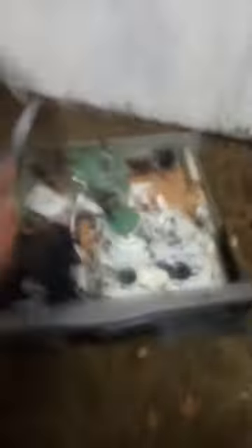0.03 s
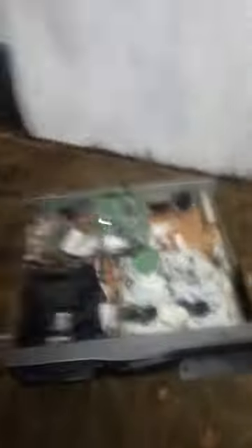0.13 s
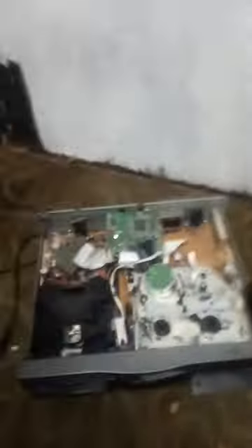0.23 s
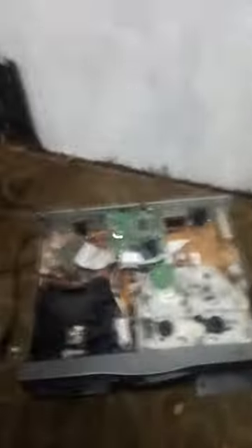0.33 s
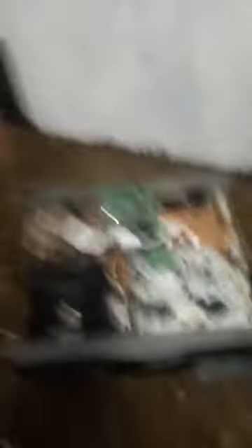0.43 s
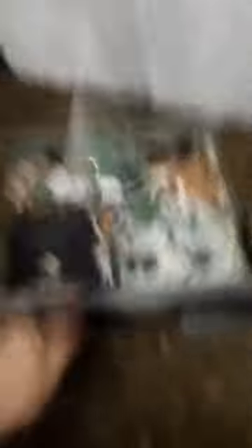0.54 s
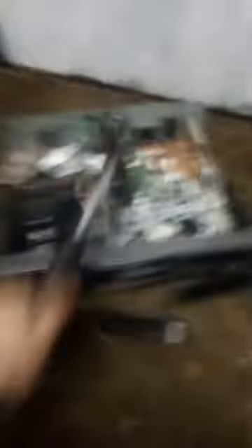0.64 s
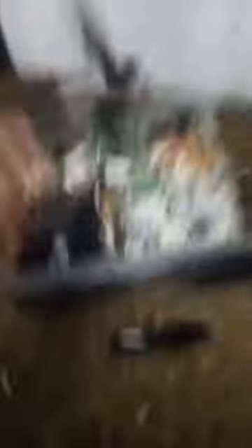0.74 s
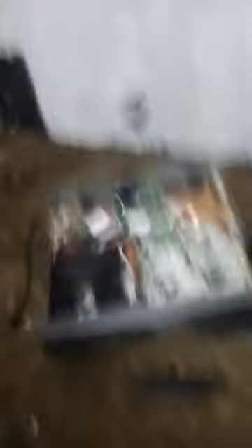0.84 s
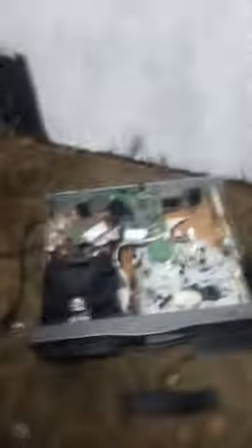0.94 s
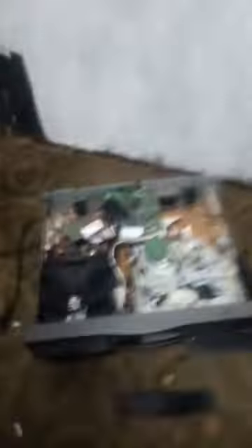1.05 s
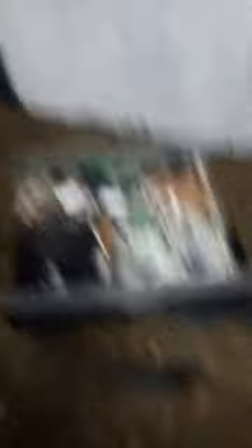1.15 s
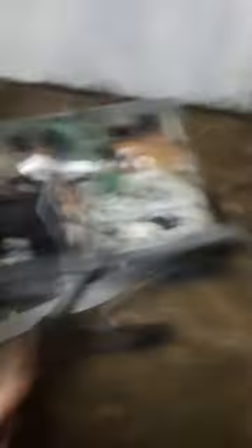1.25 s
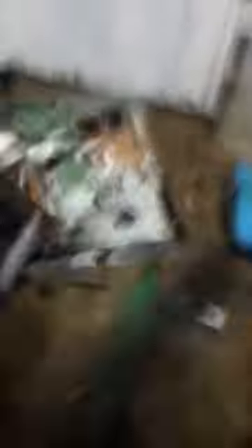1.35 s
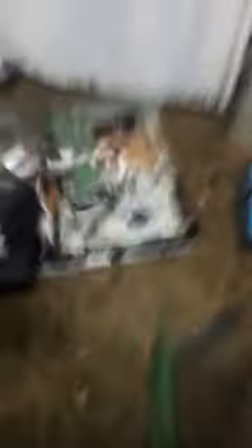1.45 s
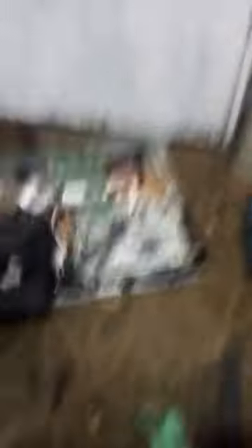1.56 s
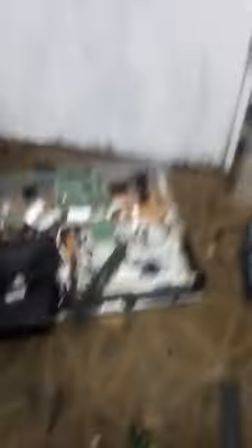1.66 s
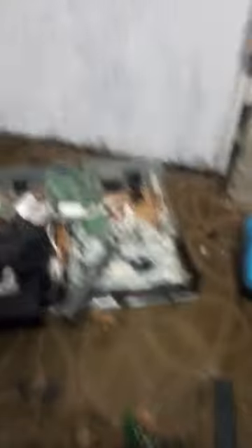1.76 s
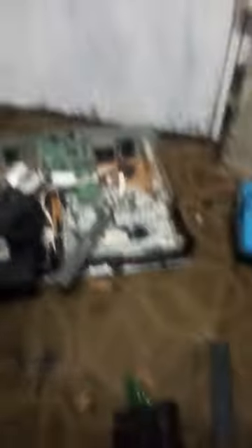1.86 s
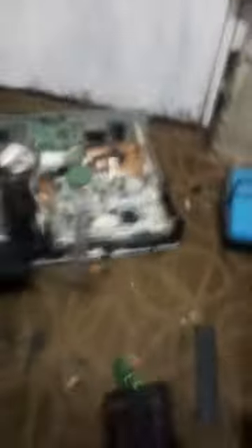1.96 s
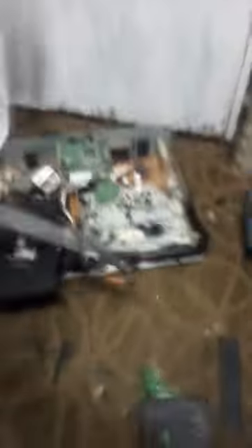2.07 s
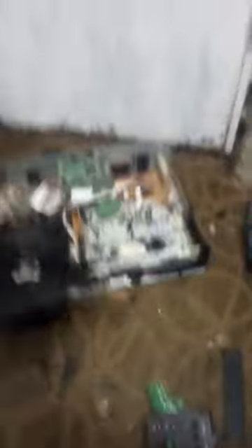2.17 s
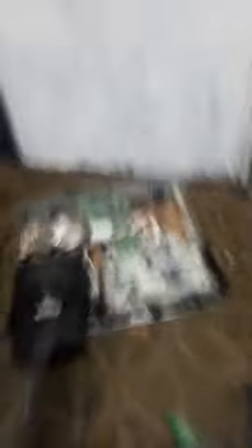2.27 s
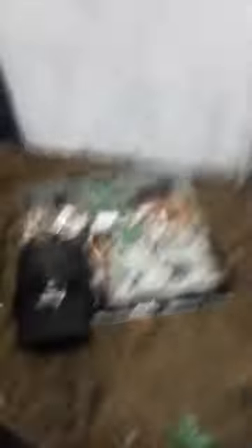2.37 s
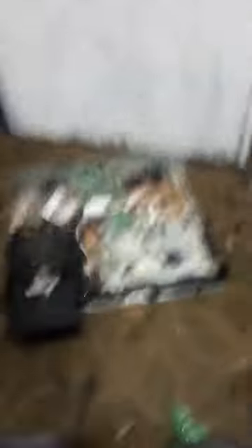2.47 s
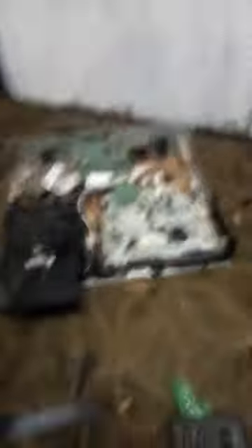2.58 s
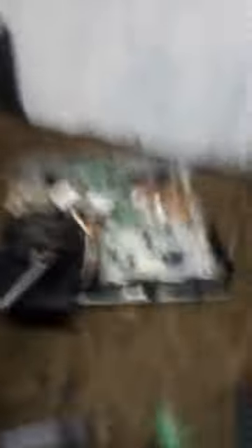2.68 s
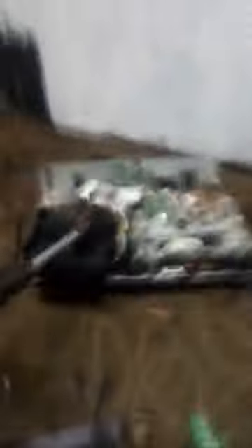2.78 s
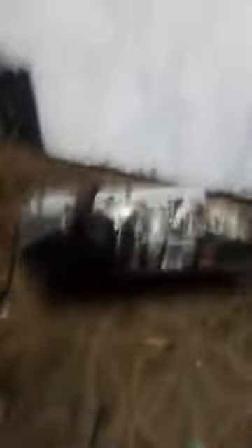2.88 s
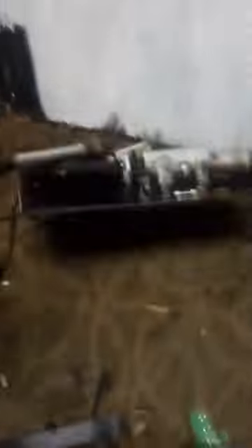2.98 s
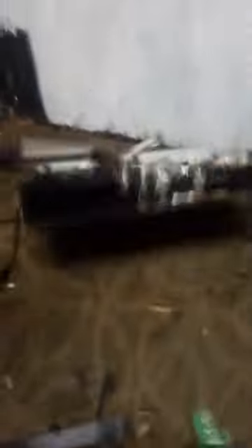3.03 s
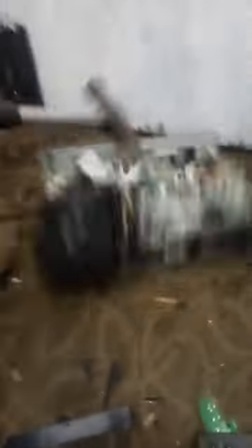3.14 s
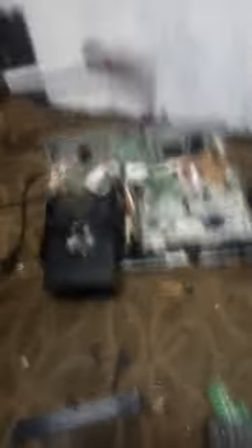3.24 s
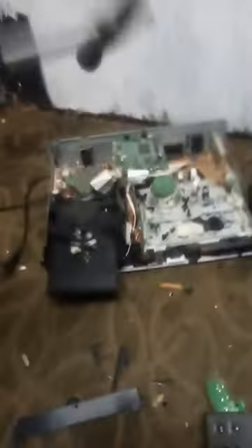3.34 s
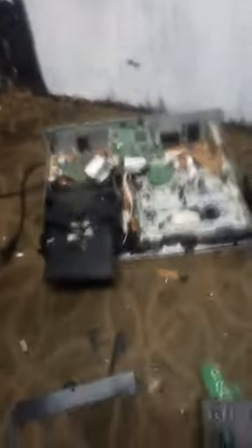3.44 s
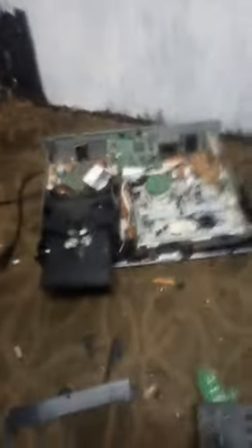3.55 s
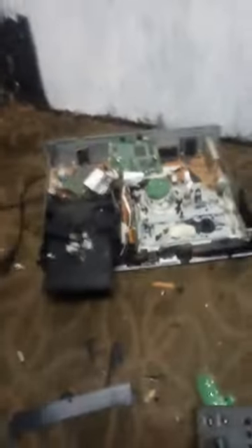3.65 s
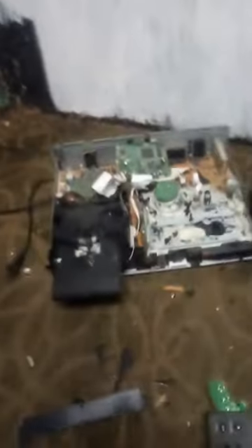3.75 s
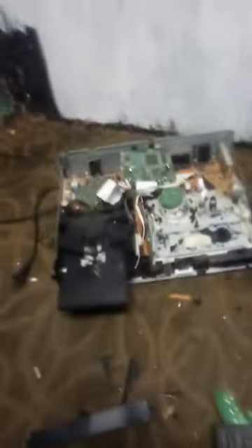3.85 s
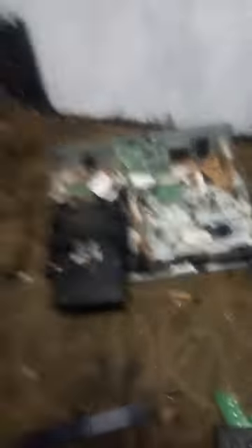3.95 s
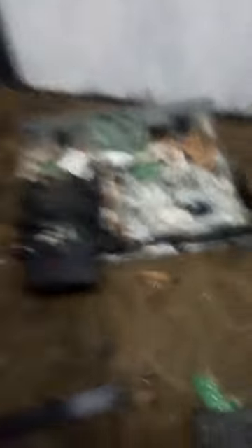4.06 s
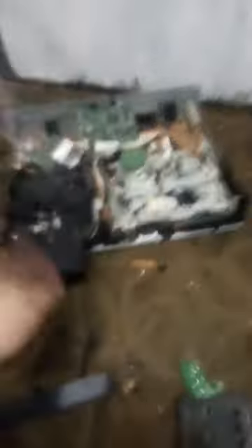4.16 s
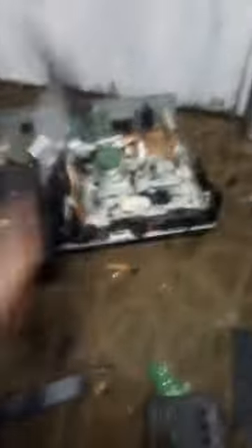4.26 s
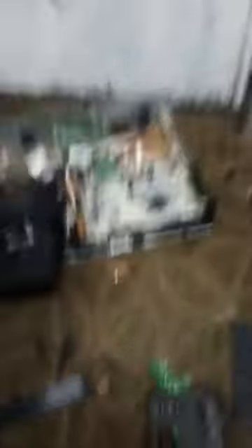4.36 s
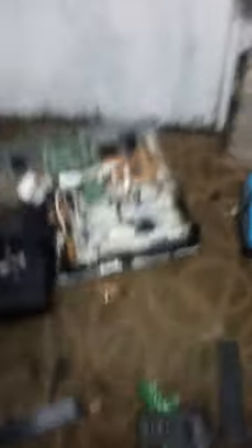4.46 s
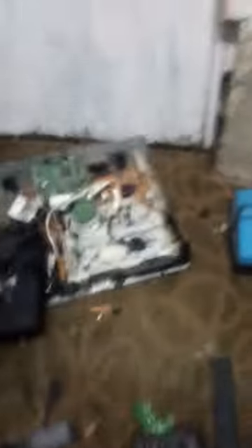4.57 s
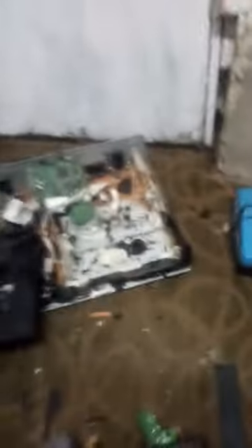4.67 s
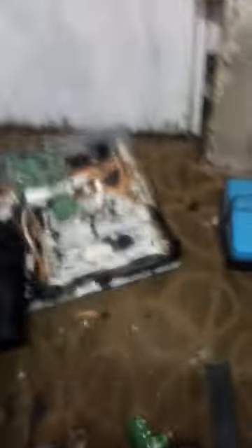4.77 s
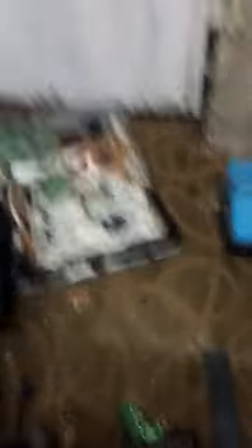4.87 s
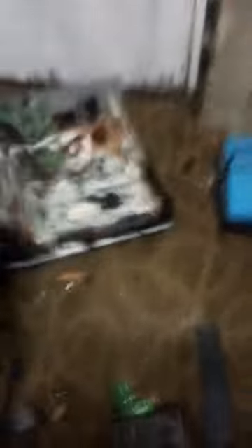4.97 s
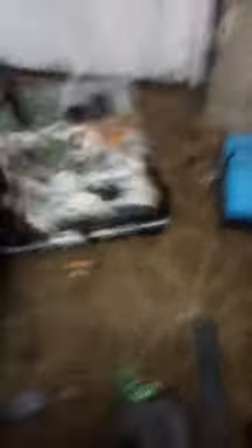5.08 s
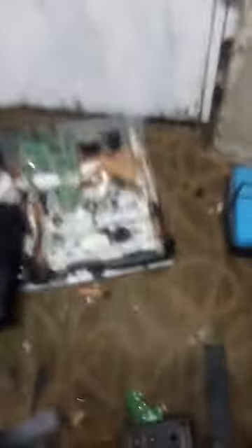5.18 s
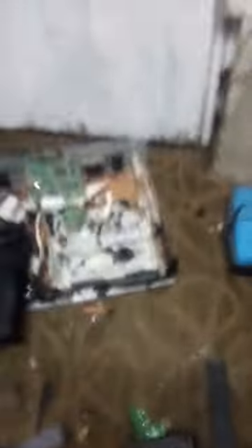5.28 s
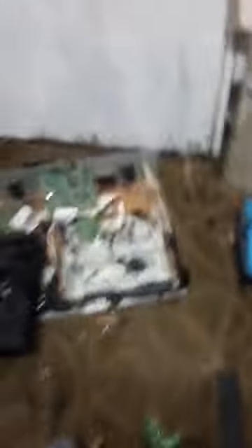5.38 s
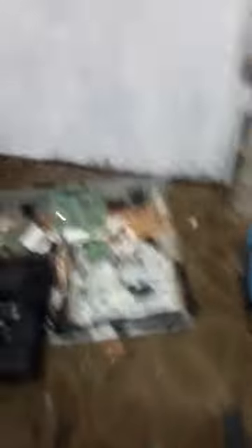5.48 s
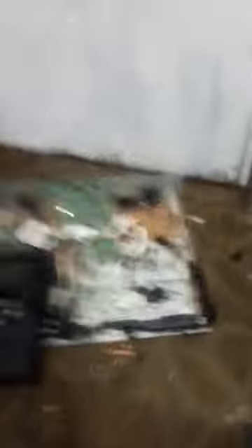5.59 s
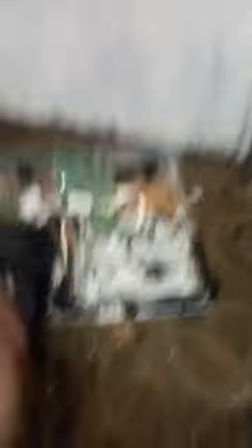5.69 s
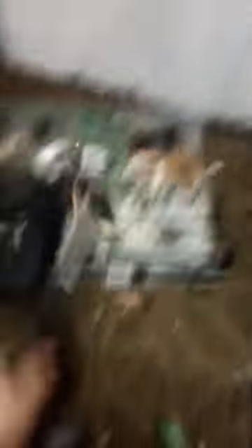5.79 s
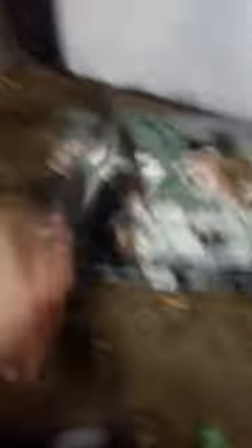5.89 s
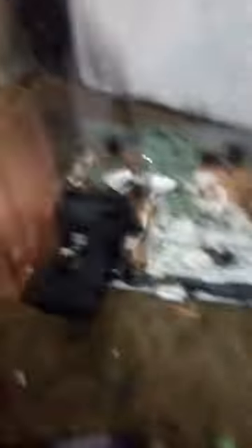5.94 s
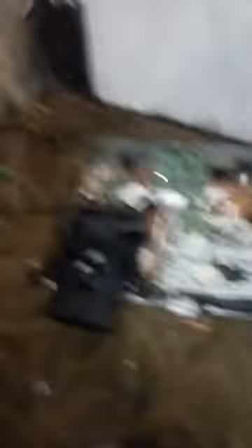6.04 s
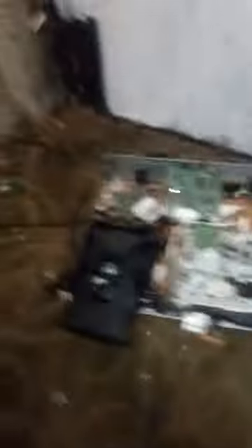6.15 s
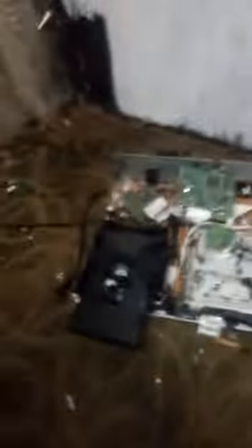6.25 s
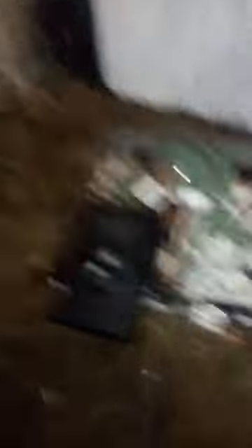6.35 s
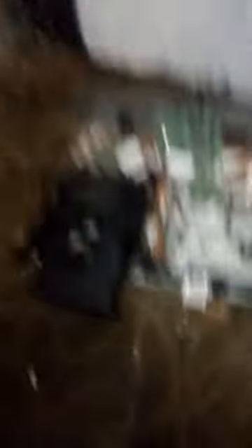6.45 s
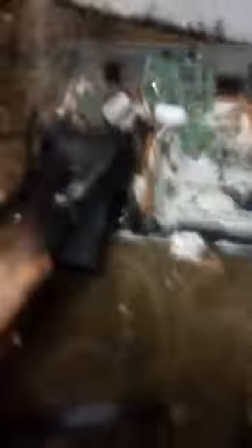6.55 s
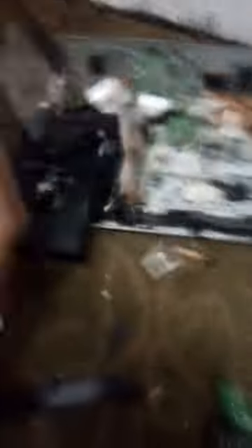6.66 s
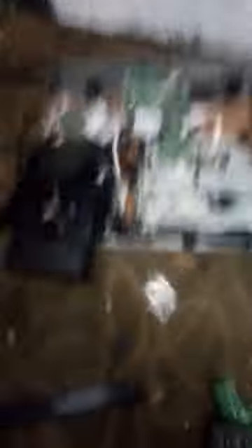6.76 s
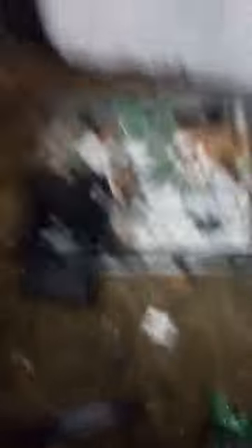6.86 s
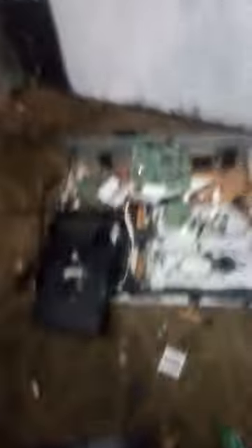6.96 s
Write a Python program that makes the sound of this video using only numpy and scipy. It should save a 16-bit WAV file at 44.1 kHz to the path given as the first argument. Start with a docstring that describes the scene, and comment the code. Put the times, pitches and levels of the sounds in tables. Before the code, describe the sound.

Close, harsh hammer blows crush a plastic and metal device about every seven tenths of a second, loose parts rattling and bits clinking outdoors.

```python
"""On the ground of a yard, close to a phone, a hammer smashes an opened electronic player: nine blows in seven seconds.
Each blow is grainy noise for the crushed plastic, scattered modes for the frame and a low noise thump.
The case lands again, larger pieces knock, small ones tinkle, loose parts rattle, and grainy noises rumble or scrape.
A faint yard answer and quiet air lie behind; the phone's limiter flattens the blows into short harsh bursts."""
import sys
import numpy as np
from scipy import signal
from scipy.fft import rfft, irfft, next_fast_len
from scipy.io import wavfile
from scipy.ndimage import uniform_filter1d

SR = 44100
rng = np.random.default_rng(int(sys.argv[2]) if len(sys.argv) > 2 else 0)


def dump(signal):
    """Clip the signal to [-1, 1] and save it as 16-bit WAV at the path in sys.argv[1]."""
    limited = np.clip(np.atleast_2d(signal).T, -1, 1)
    pcm = np.round(limited * 32767).astype(np.int16)
    wavfile.write(sys.argv[1], SR, pcm)


N = 309582
TIME = np.arange(N) / SR  # seconds
TAIL = np.arange(SR * 2 // 5) / SR  # time axis of one short sound, 0.4 s
TOP_HZ = 15900  # upper band limit

# All event levels are mix levels ahead of the phone. A t60 is the time to fall by 60 dB.
# Hammer blows. Each row: start in seconds, level in dB, crush t60 in seconds, thump in dB relative to
# that level, rattle drive in dB, rattle hold in seconds, extra rattle fall after the hold in dB per second.
HAMMER_BLOWS = [(0.581, -3.5, 0.1, -9.5, -26.5, 0.085, 86), (1.2706, -10, .2, -2.5, -30.5, 0.17, 163),
                (1.9958, -5, 0.096, -12, -26.5, 0.13, 161.5), (2.649, -16, 0.23, -2.5, -30, 0.14, 152.5),
                (3.217, -17.5, 0.19, -5, -32, .1, 152.5), (4.195, -9, .13, -8, -27, 0.16, 109.5),
                (4.971, -4, 0.08, -11, -27.5, 0.17, 130), (5.8068, -7.5, 0.11, -8, -26.5, .12, 148),
                (6.604, -9, 0.16, -5.5, -28, 0.128, 135)]
# The case falls back and shakes its parts again. Each row: start in seconds, level in dB, crack t60 in seconds,
# bump in dB relative to that level, rattle drive in dB, rattle hold in seconds, extra fall in dB per second.
CASE_LANDINGS = [(0.058, -22, 0.21, -11.5, -30.5, .11, 208), (.753, -21.5, 0.15, -10.5, -29, 0.15, 122),
                 (1.492, -25.5, 0.59, 0.5, -45.5, 0.26, 90.5), (2.875, -16.5, 0.095, -9, -34.5, 0.14, 64),
                 (3.336, -22.5, 0.13, -20.5, -31, .1, 189), (4.353, -25.5, 0.11, -23, -38, 0.14, 106),
                 (5.146, -22, .14, -14.5, -29.5, 0.16, 202), (5.966, -22.5, 0.15, -9.5, -28, 0.12, 113),
                 (6.733, -21, 0.041, -15, -27, .05, 131)]
# Larger pieces knock about. Each row: start in seconds, level in dB, crack t60 in seconds,
# bump in dB relative to that level.
PIECE_KNOCKS = [(0.136, -24, 0.018, -16.5), (.152, -26.5, 0.017, -30), (0.4557, -39.5, 0.14, -50),
                (0.662, -33, 0.047, 2.5), (.766, -23, .072, -10.5), (0.865, -31.5, 0.05, -14.5),
                (0.883, -26.5, 0.088, -17), (1.1, -34, 0.15, -42), (1.512, -29, 0.041, -1.5),
                (1.628, -27.5, 0.13, -40), (1.751, -29, 0.24, -20), (2.138, -25, 0.024, -36),
                (2.223, -30.5, 0.056, -42), (2.92, -14, 0.044, -13), (3.003, -30.5, 0.13, -15),
                (3.051, -21, 0.071, -20), (3.4, -30.5, .086, -30), (4.348, -18.5, 0.021, -16.5),
                (4.401, -24, 0.034, -23), (4.419, -19.5, 0.03, -25), (4.508, -38, 0.044, -30),
                (4.674, -48.5, 0.26, -37), (5.069, -23, 0.035, -9.5), (5.258, -25, 0.072, -31),
                (5.329, -31.5, .056, -43), (5.4405, -25.5, 0.03, -9), (5.931, -27.5, .029, -4),
                (6.148, -26.5, 0.05, -54), (6.352, -42, 0.12, -36), (6.835, -28, 0.067, -12),
                (6.88, -53, 0.37, 4), (6.99, -45, 0.1, -38)]
# Small parts ring. Each row: start in seconds, level in dB, main pitch in Hz, t60 in seconds.
SMALL_CLINKS = [(.168, -35, 11600, 0.075), (.403, -59, 4900, .07), (0.4541, -24.5, 6230, 0.03),
                (.98, -35, 6030, 0.06), (1.039, -44.5, 4940, .15), (1.118, -27.5, 5380, 0.058),
                (1.181, -55, 5460, 0.13), (1.207, -60, 2560, 0.11), (1.244, -52, 5500, 0.16),
                (1.71, -38, 9600, .043), (2.333, -43, 5000, 0.052), (2.416, -33, 7600, 0.047),
                (2.511, -47.5, 4460, 0.096), (2.545, -61, 3900, .055), (2.559, -44, 4420, .15),
                (2.588, -47.5, 4290, 0.26), (2.615, -51, 5750, .14), (3.621, -52, 5500, .02),
                (3.734, -52, 6330, 0.075), (3.757, -51, 6130, 0.12), (3.76, -64, 3620, 0.27),
                (3.862, -47, 6070, 0.073), (3.865, -64, 3610, 0.211), (3.897, -51, 6100, 0.11),
                (4.58, -49.5, 9800, 0.063), (5.439, -29.5, 3770, 0.073), (5.438, -47, 3040, 0.16),
                (6.352, -41, 2020, 0.11), (6.54, -55.5, 10040, 0.011), (6.801, -32, 9020, 0.16),
                (6.891, -39.5, 8940, 0.15)]
# Short grainy resonant noises, from low rumbles to bright scrapes.
# Each row: start in seconds, length in seconds, level in dB, resonance in Hz.
GRAINY_NOISES = [(0, 0.051, -34, 630), (.455, 0.031, -36, 4600), (0.588, 0.031, -23, 640),
                 (0.866, 0.027, -30.5, 840), (1.104, .07, -50.5, 850), (1.735, 0.14, -32.5, 4850),
                 (1.747, .11, -35, 7500), (1.889, 0.021, -51.5, 1190), (1.953, 0.015, -62.5, 1290),
                 (2.543, 0.075, -40, 4360), (2.96, 0.23, -46.5, 424), (3.031, 0.11, -50, 193),
                 (3.509, 0.032, -40.5, 2330), (4.254, .2, -37.5, 371), (4.286, 0.036, -26, 1540),
                 (4.512, 0.11, -52, 1160), (4.686, .05, -62.5, 2780), (5.018, 0.19, -41, 362),
                 (5.859, 0.42, -39.5, 590), (6.02, 0.26, -39, 1850), (6.259, 0.019, -36, 1030),
                 (6.297, 0.014, -42, 1920)]
# Further bouts of rattling; the first is already under way when the sound begins.
# Each row: start in seconds, rattle drive in dB, hold in seconds, extra fall after the hold in dB per second.
FURTHER_BOUTS = [(-.02, -25, 0.029, 161), (1.38, -29.5, 0.075, 177), (4.76, -65, 0.25, 87)]
# Low modes of the case on the ground. Each row: centre pitch in Hz, relative level in dB, t60 in seconds.
CASE_MODES = [(85, -13.5, 0.17), (123, -4.5, 0.087), (166, -3.5, 0.23), (230, 8, 0.062), (328, 3.5, 0.14)]
# Resonances of the sheet-metal chassis. Each row: pitch in Hz, width in Hz, relative strength in dB.
CHASSIS_MODES = [(623, 15, 3), (800, 30, -12.5), (1404, 110, 3), (1990, 150, -8), (4870, 1000, -16)]
# Colour of breaking plastic. Each row: frequency in Hz, relative density in dB per Hz.
CRUSH_COLOUR = [(60, -31), (150, -18.5), (390, -19.5), (550, -4), (1300, 0.5), (2700, 2), (6300, 4),
                (10000, -4.5), (16000, -7)]
# Colour of the low thump. Each row: frequency in Hz, relative density in dB per Hz.
THUMP_COLOUR = [(25, -31.5), (45, -27), (75, -5.5), (130, 0.5), (260, 0), (500, -4), (900, -7.5),
                (3000, -59.5)]
# Colour laid over the rattling parts. Each row: frequency in Hz, gain in dB.
PARTS_COLOUR = [(45, -29), (90, -9.5), (200, -2.5), (390, -9.5), (520, 0), (850, 0), (1400, 2.5),
                (2900, 3.5), (6200, 3), (10000, -5), (16000, -11.5)]
# Colour of the outdoor air. Each row: frequency in Hz, relative density in dB per Hz.
AIR_COLOUR = [(25, -5), (80, 0), (250, -4.5), (1000, -12), (4000, -26), (7000, -10.5), (10000, -8),
              (16000, -36)]
# Response of the phone's microphone. Each row: frequency in Hz, gain in dB.
MICROPHONE_RESPONSE = [(35, -8.5), (90, -2), (6500, -1.5), (8200, -3.5), (9900, 8.5), (11200, 2),
                       (12500, -4.5), (13900, -1), (14900, 2), (16000, 6.5)]

RATTLE_ATTACK_S, RATTLE_SAG_DB_PER_S = 0.015, 7.5  # the parts get going, then lose a little while they bounce
SETTLE_DB, SETTLE_DB_PER_S = -46.5, 39  # last crumbs ticking after a blow; their fall adds to the sag


def amp(db):
    """Decibels to gain."""
    return 10 ** (np.asarray(db) / 20)


def unit(x):
    """Scale to rms 1."""
    return x / np.sqrt(np.mean(x ** 2) + 1e-20)


def fade(t60):
    """An exponential decay of 60 dB in t60 seconds."""
    return np.exp(-np.log(1000) * TAIL / t60)


def shape(points, hz):
    """Gain at hz from rows of frequency and dB, joined on a log frequency axis."""
    f, db = np.transpose(points)
    return amp(np.interp(np.log(hz + 1), np.log(f), db))


def filtered(x, response):
    """Multiply the spectrum of x by a response of frequency."""
    size = next_fast_len(len(x) + SR // 10)
    spectrum = rfft(x, size) * response(np.fft.rfftfreq(size, 1 / SR))
    return irfft(spectrum, size)[:len(x)]


def resonance(f, hz, width):
    """Response of one damped mode, with gain 1 at its pitch."""
    return 1j * f * width / (hz * hz - f * f + 1j * f * width)


def noise(points, size):
    """Coloured noise of rms 1."""
    return unit(filtered(rng.standard_normal(size), lambda hz: shape(points, hz)))


def burst(sound, envelope):
    """A sound under an envelope, with the envelope's own energy."""
    return unit(sound * envelope) * np.sqrt(np.mean(envelope ** 2))


def add(track, s, sound):
    """Mix a sound into the track at s seconds."""
    part = track[round(s * SR):][:len(sound)]
    part += sound[:len(part)]


def hammer(thump_t60=0.14, thump_rise=0.0087, ring_db=-5, give=1.13):
    """Each blow crushes plastic, rings the frame and drives the case into the ground."""
    out = np.zeros(N)
    onset = 1 - np.exp(-TAIL / .0008)
    thump_envelope = fade(thump_t60) * (1 - np.exp(-TAIL / thump_rise))
    for s, db, t60, thump_db, *_ in HAMMER_BLOWS:
        # the plastic keeps breaking while the head sinks in, then stops quickly
        crushing = np.exp(-np.log(1000) * (TAIL / t60) ** give)
        crush = burst(crunch(grain_db=-2.5), crushing)
        frame = amp(ring_db) * shard(t60, spread_db=1.0, count=90)
        thump = amp(thump_db) * burst(noise(THUMP_COLOUR, len(TAIL)), thump_envelope)
        add(out, s, amp(db) * (crush + frame + thump) * onset)
    return out


def crunch(grain_db):
    """Dense fractures: noise whose strength moves to a new random value every half millisecond."""
    knots = np.arange(0, TAIL[-1], .0005)
    grain = amp(grain_db * rng.standard_normal(len(knots)))
    return unit(noise(CRUSH_COLOUR, len(TAIL)) * np.interp(TAIL, knots, grain))


def shard(t60, spread_db, count):
    """The ring of one irregular piece: scattered modes, the highest ones weak."""
    lines = np.zeros(len(TAIL) // 2 + 1, complex)
    hz = 450 + 11000 * rng.random(count) ** 1.5
    strength = amp(spread_db * rng.standard_normal(count)) / np.hypot(1, hz / 9000)
    phase = 2 * np.pi * rng.random(count)
    lines[(hz * len(TAIL) / SR).astype(int)] = strength * np.exp(1j * phase)
    return unit(irfft(lines, len(TAIL))) * fade(t60)


def knocks(ring_db=-14):
    """Landings and knocks are hard contacts: a crack, the ring of the piece and a dull bump."""
    out = np.zeros(N)
    onset = 1 - np.exp(-TAIL / .0005)
    for s, db, t60, bump_db, *_ in CASE_LANDINGS + PIECE_KNOCKS:
        crack = burst(crunch(grain_db=2.0), fade(t60))
        ring = amp(ring_db) * shard(t60=0.58 * t60, spread_db=3.5, count=45)
        add(out, s, amp(db) * (crack + ring + amp(bump_db) * bump()) * onset)
    return out


def bump(push=0.00066, modes_db=-7, puff_db=-3):
    """The case meets the ground: one low push, its slightly detuned low modes and a dull puff."""
    u = TAIL / push  # time in units of the push, itself in seconds
    shove = unit(u * (2 - u) * np.exp(-u))
    modes = np.zeros(len(TAIL))
    for hz, db, t60 in CASE_MODES:
        pitch = hz * np.exp(0.018 * rng.standard_normal())
        modes += amp(db) * np.sin(2 * np.pi * pitch * TAIL) * fade(t60)
    puff = unit(noise(THUMP_COLOUR, len(TAIL)) * fade(0.04))
    mixed = unit(shove + amp(modes_db) * unit(modes) + amp(puff_db) * puff)
    return mixed * np.sqrt(np.mean(fade(0.065) ** 2))  # the energy of a 65 ms decay


def rattle(level_db=-1.5, full_db=-31, bass_hz=380, treble_hz=7000, bass_slope=0.54, treble_slope=0.1):
    """Chatter through the chassis; as the shaking weakens it thins into single ticks and loses bass and edge."""
    level = shaking()
    slack = np.minimum(level - full_db, 0)  # dB below full shaking
    density = np.maximum(amp(slack), .07)

    def chassis(f):
        modes = sum(amp(db) * resonance(f, hz, width) for hz, width, db in CHASSIS_MODES)
        return 1 + modes / 2

    contacts = chatter(density, rate=110, size_db=18.5, clump_db=7.5, tick_db=11.0)
    parts = unit(filtered(contacts, lambda f: shape(PARTS_COLOUR, f) * chassis(f)))
    bass = filtered(parts, lambda f: 1 / (1 + (f / bass_hz) ** 6))
    treble = filtered(parts, lambda f: 1 - 1 / (1 + (f / treble_hz) ** 6))
    bass_change = bass * (amp(bass_slope * slack) - 1)
    treble_change = treble * (amp(treble_slope * slack) - 1)
    return amp(level + level_db) * (parts + bass_change + treble_change)


def shaking():
    """Drive of the loose parts in dB: blows, landings and further bouts feed them, and the energies add."""
    bouts = FURTHER_BOUTS + [(s, db, hold, fall) for s, *_, db, hold, fall in HAMMER_BLOWS + CASE_LANDINGS]
    crumbs = [(s, SETTLE_DB, 0, SETTLE_DB_PER_S) for s, *_ in HAMMER_BLOWS]
    energy = sum(shake(*bout) ** 2 for bout in bouts + crumbs)
    return 10 * np.log10(energy + 1e-12)


def shake(s, db, hold, fall):
    """Strength of one bout of rattling: a quick attack, a slowly sagging hold, a steady release."""
    age = np.maximum(TIME - s, 0)
    level = db - RATTLE_SAG_DB_PER_S * age - fall * np.maximum(age - hold, 0)
    return amp(level) * (1 - np.exp(-age / RATTLE_ATTACK_S))


def chatter(density, rate, size_db, clump_db, tick_db, colour_db=4, count=14):
    """Loose pieces take turns to jiggle, each striking its own modes at random moments."""
    out = np.zeros(N)
    knots = np.arange(0, TIME[-1], .04)
    bands = np.geomspace(400, TOP_HZ, 14)
    for _ in range(count):
        activity = amp(clump_db * rng.standard_normal(len(knots)))
        chance, sizes = rng.random((2, N))
        hits = np.flatnonzero(chance < density * rate / SR)  # rate: strikes per second at density 1
        contacts = np.zeros(N)
        contacts[hits] = np.interp(TIME[hits], knots, activity) * amp(size_db * sizes[hits])
        tick = amp(tick_db) * rng.standard_normal(len(TAIL)) * fade(.022)
        piece = shard(.14, spread_db=3.5, count=40) + tick
        colour = np.column_stack([bands, colour_db * rng.standard_normal(len(bands))])
        voice = unit(filtered(piece, lambda f: shape(colour, f)))
        out += signal.oaconvolve(contacts, voice)[:N]
    # the pieces share the energy of the shaking case: even out the level over about 29 ms
    return out / np.sqrt(np.abs(uniform_filter1d(out ** 2, size=1300)) + 1e-9)


def clinks(tick_db=-4, overtone_db=-2, scatter=.36, count=20):
    """A small part ticks and rings with one strong mode among weaker ones."""
    out = np.zeros(N)
    for s, db, hz, t60 in SMALL_CLINKS:
        others = hz * np.exp(scatter * (rng.standard_normal((count, 1)) + .5))
        sizes = rng.standard_normal((count, 1)) * (others < TOP_HZ) / np.sqrt(count)
        # modes above the main pitch die sooner
        decays = fade(t60 * np.minimum(hz / others, 1))
        weak = (sizes * np.sin(2 * np.pi * others * TAIL) * decays).sum(0)
        ring = np.sin(2 * np.pi * hz * TAIL) * fade(t60) + amp(overtone_db) * weak
        hiss = filtered(rng.standard_normal(len(TAIL)), lambda f: resonance(f, hz * 1.5, hz))
        tick = burst(hiss, fade(.035))
        add(out, s, amp(db) * (ring + amp(tick_db) * tick))
    return out


def grainy_noises(rate=220, size_db=4, ring_db=-3, width=.36):
    """Quick tiny impulses, weakening along each stroke, excite noise around one broad resonance."""
    out = np.zeros(N)
    for s, length, db, hz in GRAINY_NOISES:
        stroke = np.clip(1 - (TAIL / length) ** 2, 0, 1)
        hits = (rng.random(len(TAIL)) < rate / SR) | (TAIL == 0)  # rate: impulses per second
        impulses = hits * stroke * amp(size_db * rng.standard_normal(len(TAIL)))
        grain = rng.standard_normal(len(TAIL)) * (fade(.02) + amp(ring_db) * fade(.08))
        grains = signal.fftconvolve(impulses, grain)[:len(TAIL)]
        sound = filtered(grains, lambda f: resonance(f, hz, width * hz) ** 2)
        add(out, s, amp(db) * unit(sound) * np.sqrt(np.mean(stroke ** 2)))
    return out


def yard(x, wet_db=-28, t60=0.49):
    """A faint answer from the nearby wall and yard: a decaying noise tail convolved with the sound."""
    tail = rng.standard_normal(len(TAIL)) * fade(t60)
    answer = signal.oaconvolve(x, tail / np.linalg.norm(tail))[:N]
    return x + amp(wet_db) * answer


def air(level_db=-82):
    """Quiet outdoor air: steady coloured noise."""
    return amp(level_db) * noise(AIR_COLOUR, N)


def scene():
    """Dry blows, debris answered by the yard, and quiet outdoor air."""
    debris = knocks() + clinks() + grainy_noises() + rattle()
    return (hammer() + yard(debris) + air())[None]


def record(dry, ceiling_db=-17.0, knee=4):
    """The phone's thin bass and uneven treble, a fast limiter and the band limit."""
    x = filtered(dry[0], lambda hz: shape(MICROPHONE_RESPONSE, hz))
    level = np.sqrt(np.abs(uniform_filter1d(x ** 2, size=180)))  # rms over about 4 ms
    limited = x / (1 + (level / amp(ceiling_db)) ** knee) ** (1 / knee)
    return filtered(limited, lambda hz: np.clip((TOP_HZ - hz) / 300 + .5, 0, 1))[None]


dry = scene()
out = record(dry)
dump(out)
```